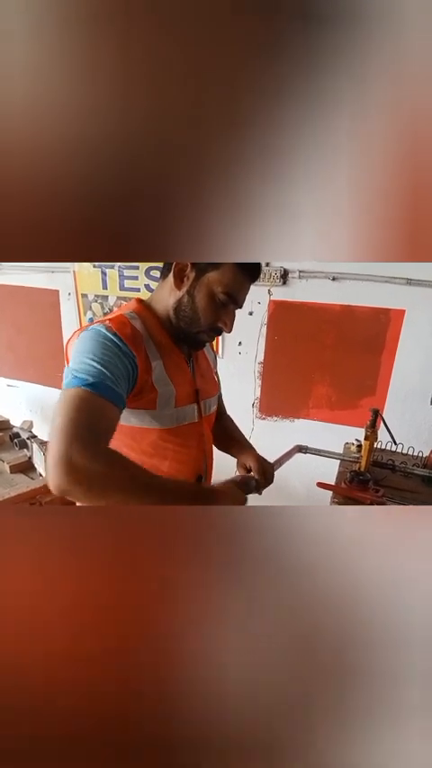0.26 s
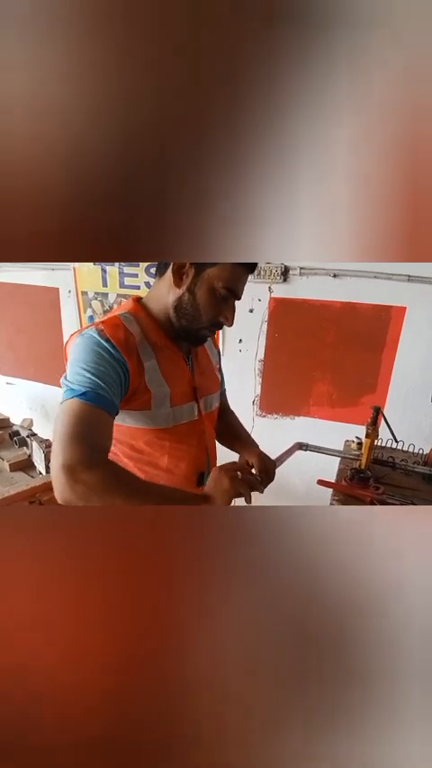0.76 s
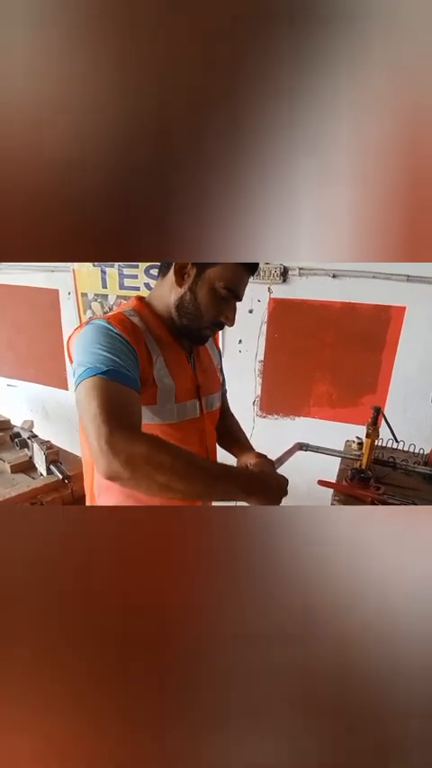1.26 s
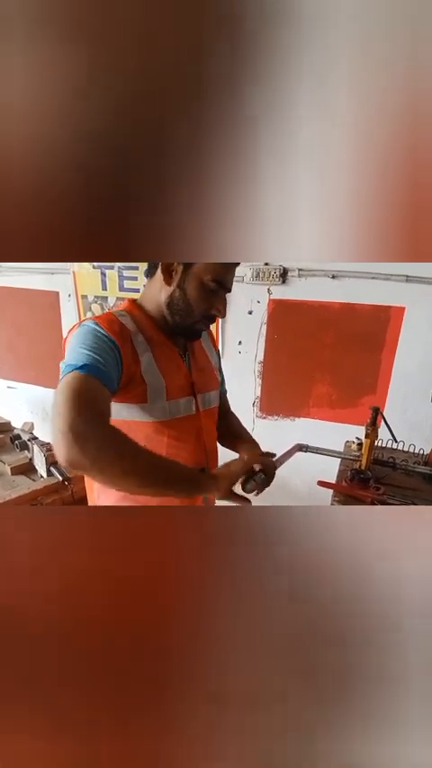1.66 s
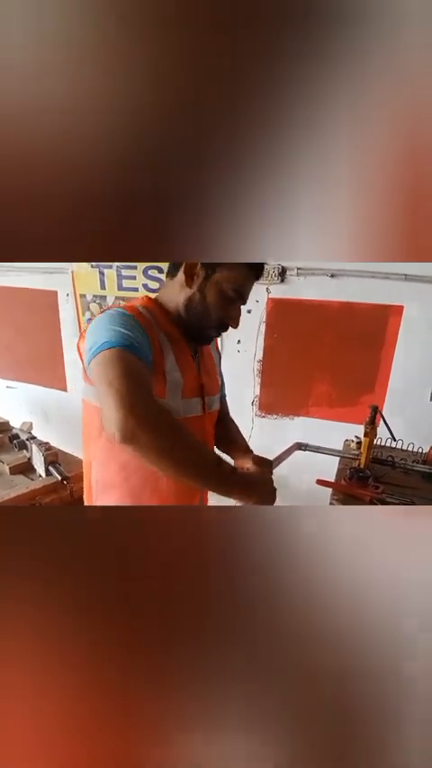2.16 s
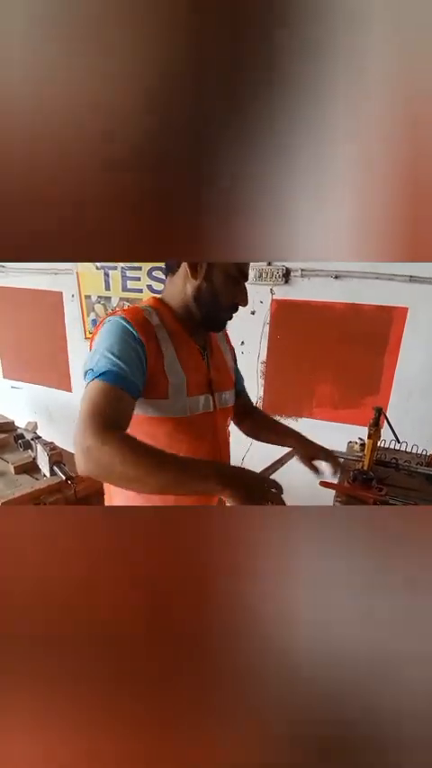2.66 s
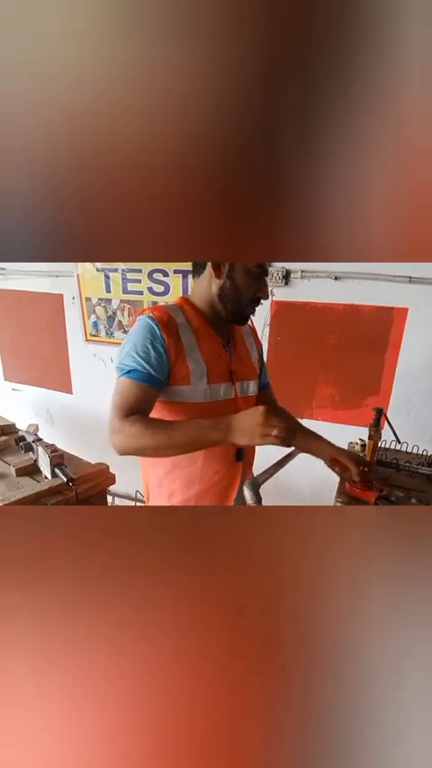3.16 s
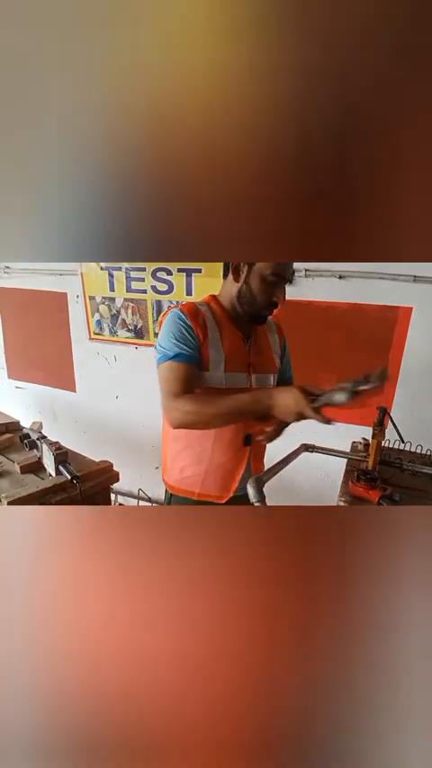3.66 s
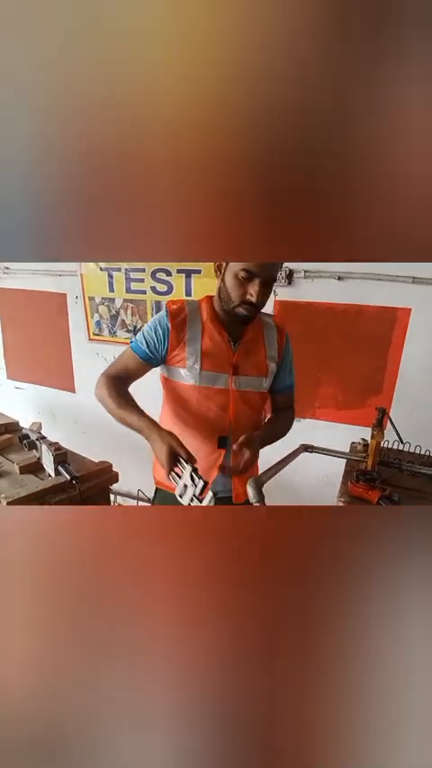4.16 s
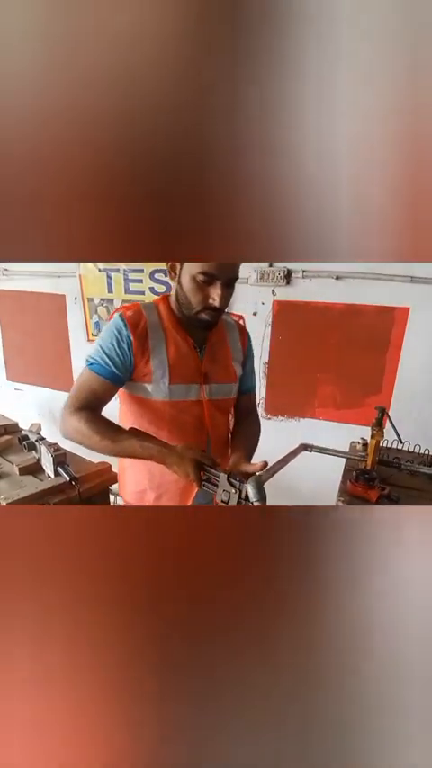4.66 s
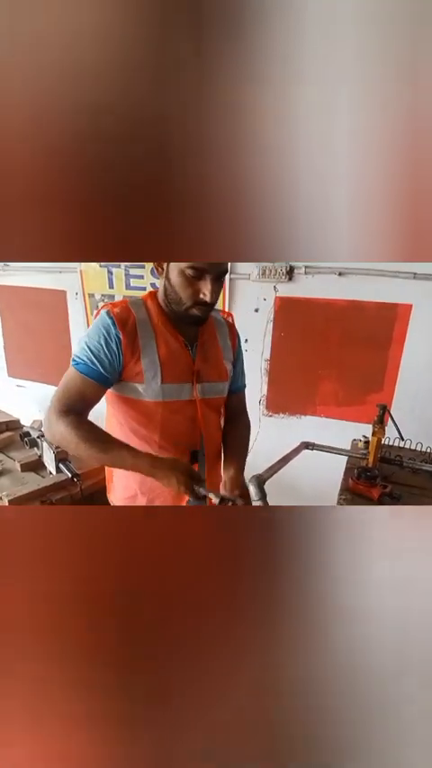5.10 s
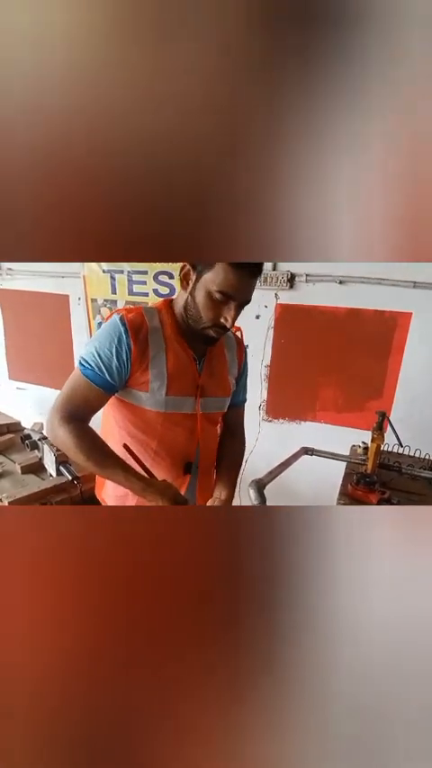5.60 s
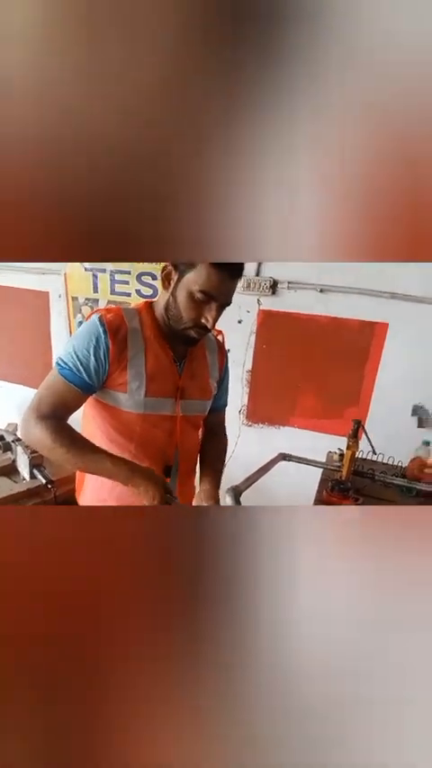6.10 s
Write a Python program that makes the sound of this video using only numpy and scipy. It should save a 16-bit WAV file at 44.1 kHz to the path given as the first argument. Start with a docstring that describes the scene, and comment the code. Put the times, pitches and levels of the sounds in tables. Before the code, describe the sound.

Irregularly spaced hammering booms through a hard-walled workshop while a wrench rattles, a pipe knocks and uneven low wind buffets the microphone.

```python
"""Hammering in an echoing workshop

Hammer blows on a bench: noise-band cracks with wall echoes and hall tails, plus resonators for the
low hall boom and the bench ring. Tools clink and rattle as struck modes, with scratches and rustle.
Underneath, gusty low noise buffets the microphone and machines hiss faintly and steadily."""
import sys
import numpy as np
from scipy import signal
from scipy.io import wavfile
from scipy.ndimage import uniform_filter1d

SR = 44100
rng = np.random.default_rng(int(sys.argv[2]) if len(sys.argv) > 2 else 0)


def generate_wav(sig):
    """Save sig (samples, or channels by samples) to the path in sys.argv[1] as 16-bit PCM at SR."""
    pcm = np.round(np.clip(np.atleast_2d(sig).T, -1, 1) * 32767).astype(np.int16)
    wavfile.write(sys.argv[1], SR, pcm)


N = 279594

# hammer blows: t/s, crack level/dB; relative to crack: boom/dB, brightness/dB, extra top-band sheen/dB, hall tail/dB
BLOWS = [(0.4086, -19.5, 5, 7, -3, -5.5), (0.7433, -26.5, 3, 12, -14, -7),
         (1.018, -15, 7.5, 4.5, -0.5, -5.5), (1.288, -18.5, 3.5, 4.5, -12, -7.5),
         (1.8613, -15, 4.8, 2.5, -4, -0.7), (2.2763, -8, -2.5, -3, 0, -7), (2.661, -7, 10.5, 2.2, 5, -6),
         (3.012, -8.5, 15, 9, -3, -4.5), (3.341, -9.5, 17, -3.5, 9.5, -1.5), (3.6434, -5, 14, -3, 8.5, -6),
         (4.2855, 4.5, 2.5, -19.5, 1.5, -3.5), (4.9038, -4, 10, 0.3, -1, -0.9), (5.4808, -4, 4.5, 3, -3, 1),
         (6.0168, -7, 9.5, -6, -2.5, 4)]
# blow at t = 0: same columns without t
FIRST_BLOW = (-26.5, 2.5, 6.5, -1, 1.5)
# centres of boom, body, crack, edge, hiss, top: f/Hz
BLOW_BANDS_HZ = (260, 800, 2700, 6000, 8600, 13000)
# far-wall echoes: delay/s, level re crack/dB
FAR_WALL = [(0.058, -10.5), (0.123, -30)]
BOOM_LAG_S = 0.0045   # the bench takes a moment to swing


def from_db(db):
    """Decibels to gain."""
    return 10 ** (np.asarray(db) / 20)


def rms_one(x):
    """Scale to rms 1."""
    return x / np.sqrt(np.mean(x ** 2) + 1e-20)


def at_hz(points, hz):
    """Read a (Hz, value) table on a log-frequency axis."""
    table = np.array(points)
    return np.interp(np.log(hz), np.log(table[:, 0]), table[:, 1])


def bandpass(x, order, low_hz, high_hz):
    """Butterworth band-pass."""
    return signal.sosfilt(signal.butter(order, [low_hz, high_hz], "band", fs=SR, output="sos"), x)


def highpass(x, order, hz):
    """Butterworth high-pass."""
    return signal.sosfilt(signal.butter(order, hz, "high", fs=SR, output="sos"), x)


def clicks(times_s, gains):
    """Train of single-sample impulses on a negligible offset."""
    out = np.full(N, 1e-18)
    np.add.at(out, np.round(np.asarray(times_s) * SR).astype(int), gains)
    return out


def ring(x, hz, t60_s):
    """Two-pole resonator: a unit click starts a decaying sine of height about 1."""
    r, w = from_db(-60 / (t60_s * SR)), 2 * np.pi * hz / SR
    return signal.lfilter([0, np.sin(w)], [1, -2 * r * np.cos(w), r * r], x)


def fade(x, t60_s):
    """One-pole decay: each click dies away exponentially."""
    return signal.lfilter([1], [1, -from_db(-60 / (t60_s * SR))], x)


def drift(rate_hz):
    """Noise through a double low-pass pole at rate_hz, rms 1, computed at SR / 10."""
    r = np.exp(-20 * np.pi * rate_hz / SR)
    white = rng.standard_normal(N // 10 + 4002)
    slow = rms_one(signal.lfilter([1], [1, -2 * r, r * r], white)[4000:])   # drop the filter's start-up
    return np.interp(np.arange(N) / 10, np.arange(len(slow)), slow)


def bands():
    """Yield (centre Hz, noise) in 1/6-octave bands coloured by the microphone; neighbours are unrelated."""
    # resonances of the microphone in its housing: f/Hz, gain/dB
    microphone = [(1300, -2), (1900, 0), (2500, 5), (3100, 1), (4200, 2), (5000, -6), (5800, 1), (6900, -7),
                  (8600, 3), (10300, -4), (12600, 1), (15500, 0)]
    edges_hz = 22 * 2 ** np.arange(0, 9.7, 1 / 6)
    white = rng.standard_normal((2, N))
    for k, (low, high) in enumerate(zip(edges_hz, edges_hz[1:])):
        hz = np.sqrt(low * high)
        yield hz, from_db(at_hz(microphone, hz)) * bandpass(white[k % 2], 2, low, high)


def air():
    """Turbulence at the microphone as lumpy low noise, draught plus puffs, over a steady machine hiss."""
    # swelling and sinking draught: t/s, level/dB
    draught = [(0.0, -41), (1.02, -35.5), (1.64, -40), (1.85, -75), (2.05, -23), (2.47, -34.5), (2.68, -41),
               (3.16, -38), (3.25, -49), (3.74, -40), (4.06, -31.5), (5.14, -25), (5.33, -61), (5.54, -62),
               (5.65, -55), (6.34, -56)]
    # separate puffs: start/s, length/s, level/dB, gustiness (gain per octave above 110 Hz)/dB
    puffs = [(0.078, 0.052, -24, -0.5), (0.185, 0.052, -21, -20), (0.338, 0.045, -28, -8.5),
             (0.406, 0.17, -26.5, -2.5), (0.679, 0.035, -21, -10.5), (0.766, 0.17, -24, -5.5),
             (0.988, 0.21, -26.5, -2), (1.584, 0.041, -27, -3), (1.8, 0.058, -35.5, -2),
             (1.894, 0.11, -25, 1.5), (1.982, 0.073, -20, -2), (2.067, 0.11, -17.5, -5),
             (2.638, 0.062, -16, -9), (3.547, 0.097, -12, -24), (3.695, .2, -19.5, -6),
             (3.939, 0.025, -9.5, -31), (4.004, 0.017, -13.5, -4), (4.117, 0.017, -21.5, 2),
             (4.151, 0.031, -16.5, -9), (4.226, 0.029, -11, -12.5), (4.33, 0.095, -19, 3),
             (4.712, 0.071, -32, -15), (4.848, 0.024, -14, -22), (5.096, 0.11, -23, -0.5),
             (5.227, 0.053, -28, -10), (5.313, 0.037, -16.5, 0), (5.612, 0.17, -28.5, 2.5),
             (5.779, 0.079, -16.5, -11), (5.951, 0.032, -20, -6.5), (6.17, 0.18, -31.5, 4)]
    # buffeting spectrum: f/Hz, relative density/dB per Hz
    buffet = [(25, -51), (45, -33), (80, -4.5), (120, 1.5), (200, 0), (300, -2), (450, -9.5), (700, -35)]
    # hiss spectrum: f/Hz, relative density/dB per Hz
    hiss_spectrum = [(250, -2.5), (400, -18.5), (600, -15.5), (1000, -12.5), (2000, -17.5), (4000, -26),
                     (6300, -30), (7200, -48), (10000, -46), (16000, -64)]
    puff_edge_s, draught_gust_db, hiss_db = 0.0088, -3.5, -38.5

    t = np.arange(N) / SR
    draught_db = np.interp(t, *np.transpose(draught))
    shapes = []
    for s, length, *_ in puffs:
        from_edge_s = np.minimum(t - s, s + length - t)
        shapes.append(np.clip(from_edge_s / puff_edge_s + .5, 0, 1) ** 2)
    spans = [np.flatnonzero(shape) for shape in shapes]
    lumps = drift(15.3)
    wind, calm, hiss = 0, 0, 0
    for hz, noise in bands():
        if hz < 900:
            reach = np.clip(np.log2(hz / 110), 0, 2)   # octaves above 110 Hz
            power = from_db(2 * (draught_db + reach * draught_gust_db))
            for (_, _, db, gust_db), shape, span in zip(puffs, shapes, spans):
                power[span] += shape[span] * from_db(2 * (db + reach * min(gust_db, 3)))
            buffet_db = at_hz(buffet, hz)
            lump_db = (3.5 + 0.16 * reach) * lumps
            calm = calm + noise * from_db(buffet_db)
            wind = wind + noise * np.sqrt(power) * from_db(buffet_db + lump_db)
        hiss = hiss + noise * from_db(at_hz(hiss_spectrum, hz))
    return wind / np.std(calm) + from_db(hiss_db) * rms_one(hiss)   # wind re its unmodulated level


def rustle():
    """Gated high-band noise with a slowly varying level: a thin patchy hiss."""
    # faint treble rustle: start/s, end/s, level/dB
    rustle_span = (1.66, 1.86, -66)
    start_s, end_s, level_db = rustle_span
    t = np.arange(N) / SR
    gate = uniform_filter1d(1. * (t > start_s) * (t < end_s), size=600)
    noise = bandpass(rng.standard_normal(N), 2, 8000, 15500)
    return gate * noise * from_db(level_db + 2.3 * drift(30))


def scuffs():
    """Tool lifted off the bench: short dry scratches of decaying noise, each in its own band."""
    # scuffs: t/s, level before band-pass/dB, centre f/Hz, width/octaves
    scuff_table = [(3.259, -18.5, 4400, 0.77), (3.272, -29, 5500, .3), (3.312, -28, 3100, 0.68)]
    out = np.zeros(N)
    for s, db, hz, octaves in scuff_table:
        burst = fade(clicks([s], from_db(db)), t60_s=0.12) * rng.standard_normal(N)
        half = 2 ** (octaves / 2)
        out += bandpass(burst, 2, hz / half, hz * half)
    return out


def jingles():
    """Random small contacts of the wrench, a few ms or more apart: rows of (s, dB, brightness dB)."""
    # jingling spells: start/s, end/s, mean relative level/dB
    spells = [(5.346, 5.455, -30.5), (5.91, 6.01, -30)]
    median_gap_s, level_spread_db, bright_spread_db = 0.013, 3.5, 4.2
    chance = rng.standard_normal((len(spells), 40, 3))
    rows = []
    for (start, end, db), draws in zip(spells, chance):
        s = start + np.cumsum(median_gap_s * np.exp(.5 * draws[:, 0]))
        contacts = np.transpose([s, db + level_spread_db * draws[:, 1], bright_spread_db * draws[:, 2]])
        rows += list(contacts[s < end])
    return rows


def struck(contacts, modes, spread_db, chatter_db, chatter_t60_s, scratch_db):
    """Each contact clicks, chatters with grit and scratches; it drives each mode with its own strength."""
    s, level_db, bright_db = np.transpose(contacts)
    scratch = fade(clicks(s, from_db(level_db + scratch_db)), t60_s=0.071) * rng.standard_normal(N)
    out = bandpass(scratch, 3, 1500, 5000)
    luck_db = rng.normal(0, spread_db, (len(s), len(modes)))
    for k, (hz, db, t60_s) in enumerate(modes):
        lift_db = bright_db * np.clip(np.log2(hz / 3000), 0, 1)   # hard contacts favour the high modes
        hits = clicks(s, from_db(level_db + db + lift_db + luck_db[:, k]))
        chatter = from_db(chatter_db) * fade(hits, chatter_t60_s) * rng.standard_normal(N)
        out += ring((-1) ** k * hits + chatter, hz, t60_s)
    return out


def pipe_knocks():
    """A tool set against a pipe excites the pipe's modes."""
    # contacts: t/s, relative level/dB, brightness/dB
    knocks = [(4.7054, -14, 9), (4.7415, -7, -8), (4.752, -12, 3), (4.762, -14, -6), (4.79, -17, -6)]
    # pipe modes: f/Hz, relative level/dB, t60/s
    pipe_modes = [(1443, -16, .07), (1766, -14, .08), (1965, -6, .07), (2261, 0, .075), (2676, -12, .08),
                  (3074, -9, .06), (3505, -14, .05), (4608, -25, .2), (11370, -46, .07), (12940, -52, .06)]
    return from_db(-10) * struck(knocks, pipe_modes, spread_db=1.5,
                                 chatter_db=-19, chatter_t60_s=.06, scratch_db=-6)


def wrench_rattle():
    """The loose jaw of a wrench rattles and jingles, exciting the wrench's modes."""
    # contacts: t/s, relative level/dB, brightness/dB
    rattle = [(3.222, -31, 20), (5.1606, -21, 15), (5.1917, -13, 3), (5.2185, -22.5, 5), (5.3014, -23, -9),
              (5.3284, -17, -4), (5.3523, -13.5, -5), (5.3676, -15, 3), (5.3794, -12.5, 1),
              (5.4131, -11, 1), (5.4283, -26, -3), (5.9299, -16, 1), (5.9409, -14, 2.5), (5.9838, -21, 9)]
    # wrench modes: f/Hz, relative level/dB, t60/s
    wrench_modes = [(2050, -5, .04), (2164, -2, .04), (2300, -4, .03), (2450, -3, .04), (2514, 0, .04),
                    (2760, -4, .05), (3180, -3, .05), (3690, -8, .04), (3870, -12, .04), (5300, -10, .09),
                    (6095, -13, .09), (7052, -23, .04), (8207, -24, .04), (11910, -30, .12)]
    return from_db(-14) * struck([*rattle, *jingles()], wrench_modes, spread_db=3.5,
                                 chatter_db=-25, chatter_t60_s=0.11, scratch_db=0)


def blow_columns():
    """All blows as columns: s, crack, boom, brightness, sheen and hall tail dB."""
    return np.transpose([(0, *FIRST_BLOW), *BLOWS])


def body_db(boom_db):
    """A blow that booms also has more body: level re crack in dB."""
    return -4.5 + 0.44 * boom_db


def hall_boom():
    """The bench's soft thud sets off low standing waves of the hall; a far wall returns it once."""
    # hall modes: f/Hz, relative level/dB, t60/s, sign at the microphone
    hall_modes = [(123.5, -18, 0.84, -1), (137.3, -17, 0.99, -1), (158.4, -7, 0.45, 1),
                  (171, -13.5, 0.48, -1), (188, -9, 0.68, -1), (203.4, -10.5, 1.1, -1),
                  (223.5, -10, 0.58, 1), (240, 0, 0.34, -1), (255.5, -8, 0.52, -1), (272.5, -6.5, 0.82, -1),
                  (284.1, -6.5, 0.65, 1), (294.6, -8.5, 0.88, -1), (317.8, -5, 0.7, 1),
                  (328.2, -12, 0.59, 1), (405, -24, .8, 1), (516, -20, 0.76, -1), (571, -31, 0.45, 1)]
    boom_level_db, echo_db, spread_db = -11.5, -5.5, 0.7
    s, crack_db, boom_db, *_ = blow_columns()
    luck_db = rng.normal(0, spread_db, (len(s), len(hall_modes)))
    thud_s = s + BOOM_LAG_S
    out = np.zeros(N)
    for k, (hz, db, t60_s, sign) in enumerate(hall_modes):
        gains = sign * from_db(crack_db + boom_db + db + boom_level_db + luck_db[:, k])
        thuds = clicks(thud_s, gains) + clicks(thud_s + FAR_WALL[0][0], gains * from_db(echo_db))
        soft_thuds = signal.lfilter([.08], [1, -.92], thuds)
        out += ring(soft_thuds, hz, t60_s)
    return highpass(out, 2, 95)


def bench_ring():
    """The bench and its clamped steel ring as damped modes after each blow."""
    # bench modes: f/Hz, relative level/dB, t60/s
    bench_modes = [(413, -3, .35), (515, -1.5, .35), (721, -7, .25), (1069, -9, .18), (1599, -8, .2),
                   (1960, -5, .25), (2268, -5, .25), (2494, -1.5, .3), (2624, -3, .25), (3118, -6, .2),
                   (3310, -7, .2), (4160, -6, .15)]
    level_db, spread_db = -19, 0.5
    s, crack_db, boom_db, *_ = blow_columns()
    luck_db = rng.normal(0, spread_db, (len(s), len(bench_modes)))
    out = np.zeros(N)
    for k, (hz, db, t60_s) in enumerate(bench_modes):
        # body weight: 1 at the body band, 0 from the crack band up
        body_share = np.interp(np.log(hz), np.log(BLOW_BANDS_HZ[1:3]), [1, 0])
        gains = from_db(crack_db + body_share * body_db(boom_db) + db + level_db + luck_db[:, k])
        out += ring((-1) ** k * clicks(s + BOOM_LAG_S, gains), hz, t60_s)
    return out


def hammer_crack():
    """Steel tick, short crack with wall echoes, and hall tail: noise bands with their own decays."""
    # colour of the crack: f/Hz, relative level/dB
    steel = [(350, 2.5), (520, -5.5), (700, -4), (1070, -4.5), (1500, -4.5), (2700, -2.5), (4200, 0.5),
             (6300, 0.5), (12500, 3.5), (16000, 3.5)]
    # low cut, as standing waves carry most of the sound there: f/Hz, gain/dB
    low_cut = [(60, -36), (110, -18), (330, -18), (430, 0)]
    # hall decay: f/Hz, t60/s
    hall_t60 = [(100, 0.62), (260, 0.85), (700, 1.25), (1840, 1), (4850, 0.77), (12800, 0.58)]
    # edge, hiss, top: level at zero brightness/dB, share of the brightness
    treble = [(-9, 0.3), (-13, 0.54), (-22.5, 0.65)]
    crack_level_db, hall_level_db = -14, -0.5
    crack_t60_at_2700_hz_s, dulling_power = 0.095, 0.12   # the crack dies faster in the treble

    s, crack_db, boom_db, bright_db, sheen_db, hall_db = blow_columns()
    treble_db = [db + share * bright_db for db, share in treble]
    tilt_db = np.array([boom_db, body_db(boom_db), 0 * s, *treble_db])
    tilt_db[-1] += sheen_db
    rise = from_db(-60 / (0.028 * SR))   # first reflections build the sound up over a few ms
    out = np.zeros(N)
    for hz, noise in bands():
        colour_db = [np.interp(np.log(hz), np.log(BLOW_BANDS_HZ), blow) for blow in tilt_db.T]
        level_db = crack_db + colour_db + at_hz(steel, hz) + at_hz(low_cut, hz) + crack_level_db
        strikes = clicks(s, from_db(level_db))
        for delay_s, db in FAR_WALL:
            strikes += clicks(s + delay_s, from_db(level_db + db))
        crack = fade(strikes, crack_t60_at_2700_hz_s * (hz / 2700) ** -dulling_power)
        tail = fade(clicks(s, from_db(level_db + hall_db + hall_level_db)), at_hz(hall_t60, hz))
        envelope = signal.lfilter([1 - rise], [1, -rise], crack + tail)
        # the steel-on-steel tick skips the build-up, brightest on top
        tick_db = level_db + 3 + 2.5 * np.log2(hz / 4000)
        envelope += fade(clicks(s, from_db(tick_db)), t60_s=0.02)
        out += envelope * noise * np.sqrt(SR / hz / 0.44)   # equalize power across bands
    return out


def scene():
    """Sum of all sources at one microphone."""
    background = air() + rustle()
    tools = scuffs() + pipe_knocks() + wrench_rattle()
    hammer = hall_boom() + bench_ring() + hammer_crack()
    return (background + tools + hammer)[None]


def record(dry):
    """Gain control ducks loud blows and recovers; peaks are rounded, deep bass and the top are cut."""
    threshold_db, duck_per_db, release_db_per_s = -22, 0.3, 45   # release of the held level
    level_db = 10 * np.log10(uniform_filter1d(dry[0] ** 2, size=400) + 1e-12)
    slope_db = release_db_per_s * np.arange(N) / SR
    held_db = np.maximum.accumulate(level_db + slope_db) - slope_db
    duck_db = -duck_per_db * np.maximum(held_db - threshold_db, 0)
    duck_db = signal.lfilter([.004], [1, -.996], duck_db)   # smooth the gain
    out = 1.268 * np.tanh(dry * from_db(duck_db) / 1.218)
    out = highpass(out, 3, 55)
    return signal.sosfilt(signal.cheby2(12, 60, 16100, fs=SR, output="sos"), out)


dry = scene()
out = record(dry)
generate_wav(out)
```